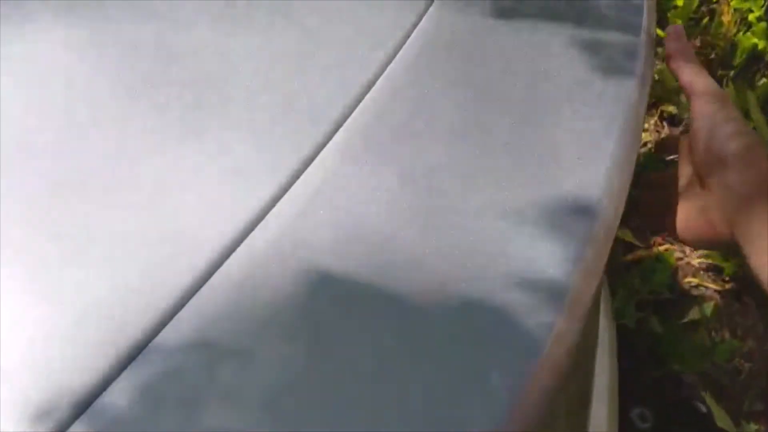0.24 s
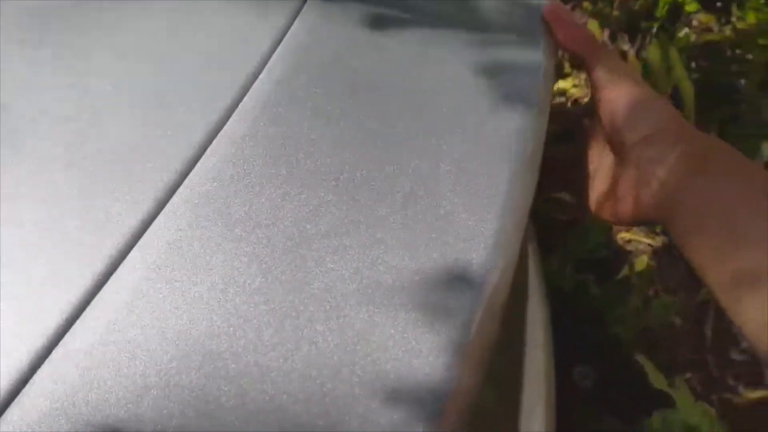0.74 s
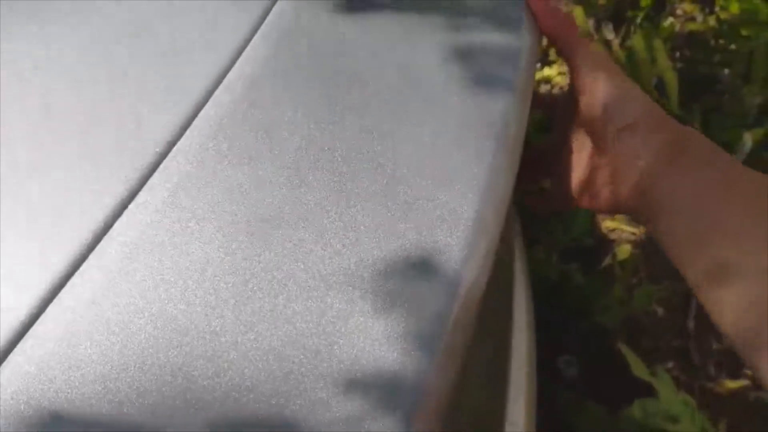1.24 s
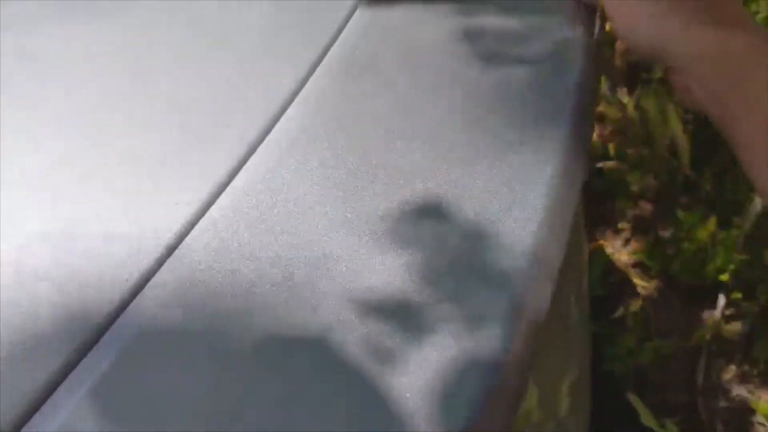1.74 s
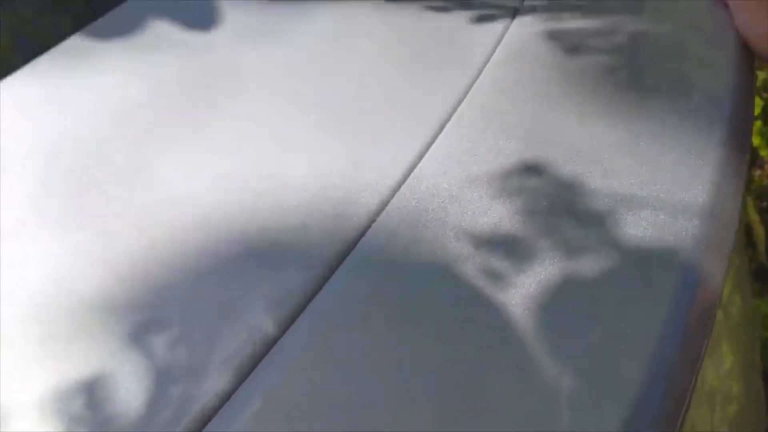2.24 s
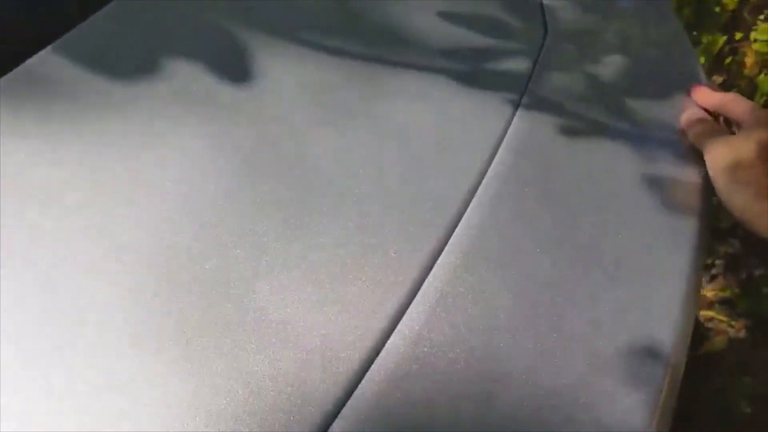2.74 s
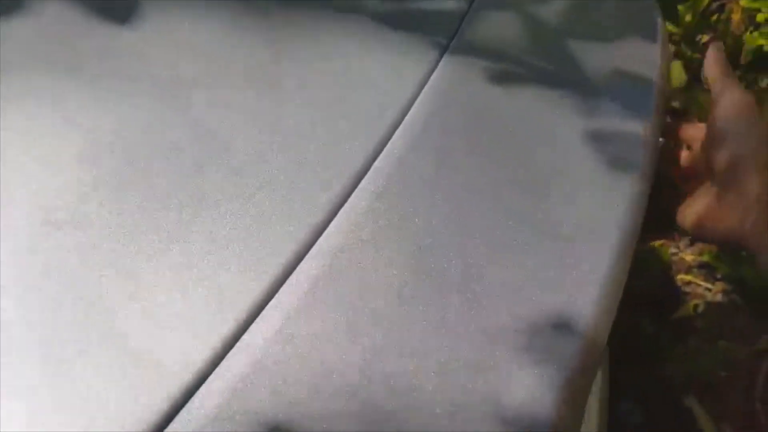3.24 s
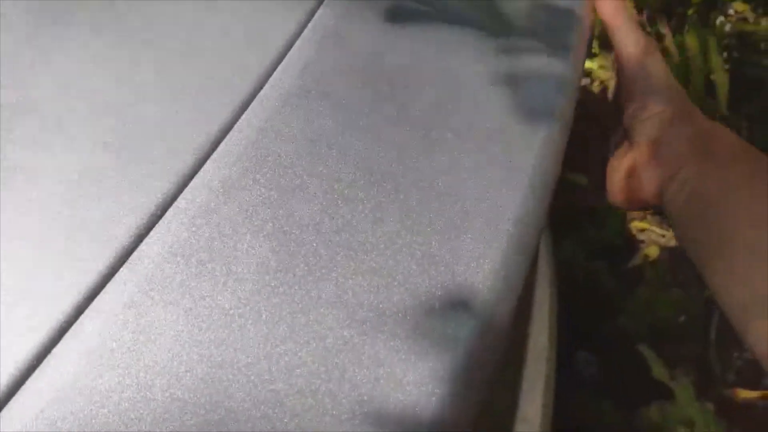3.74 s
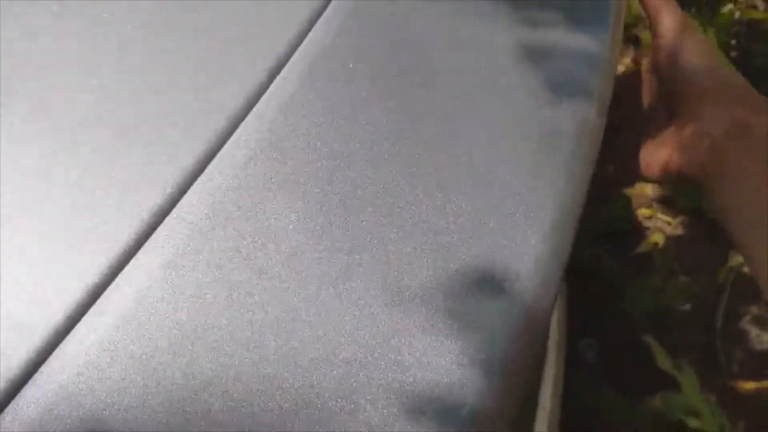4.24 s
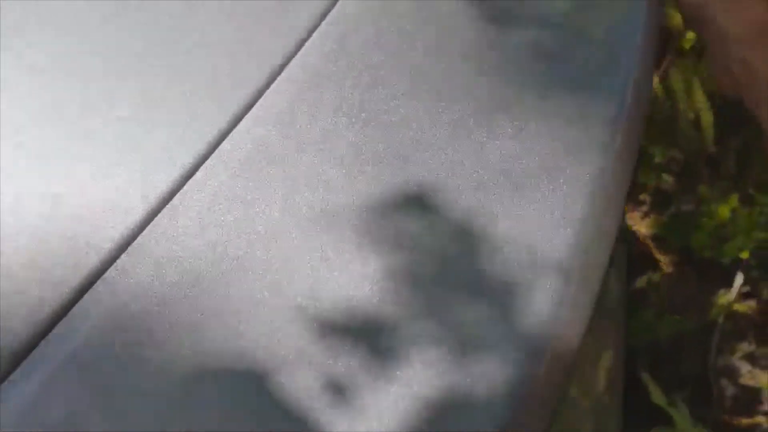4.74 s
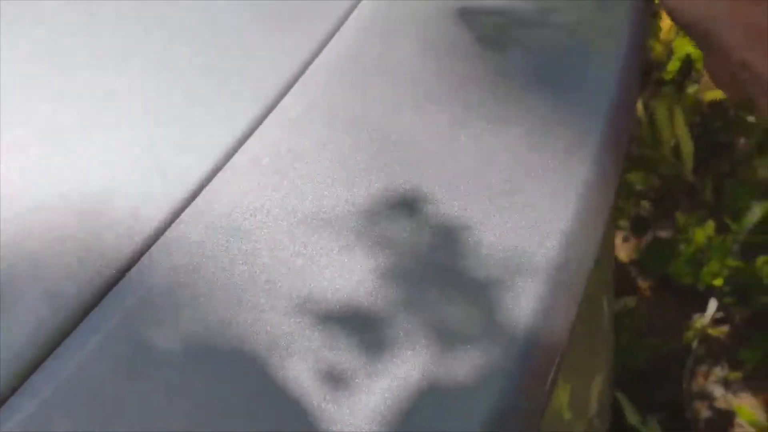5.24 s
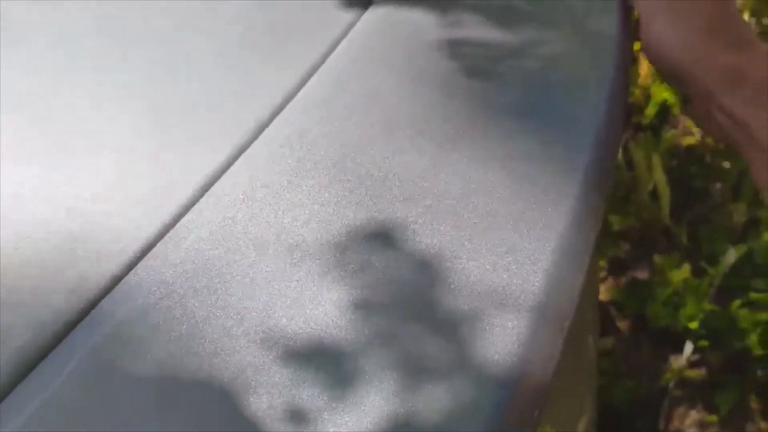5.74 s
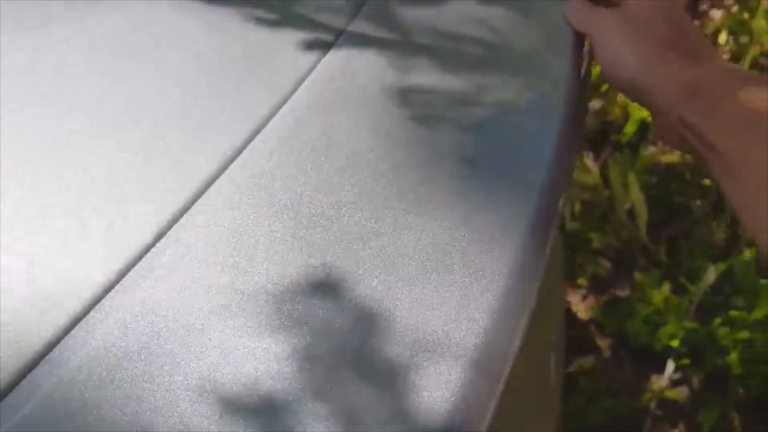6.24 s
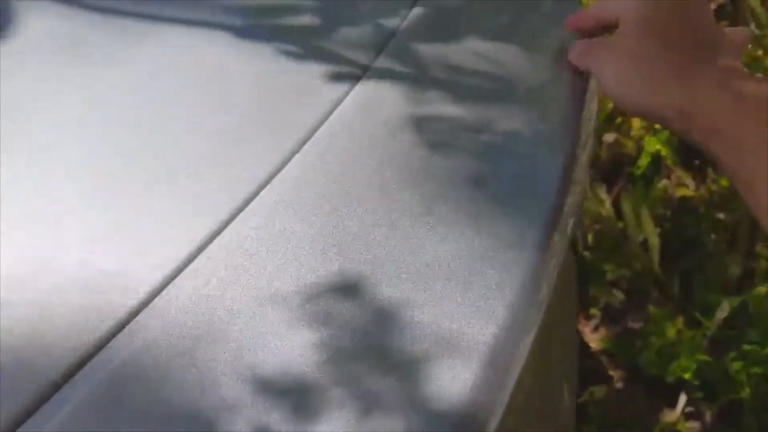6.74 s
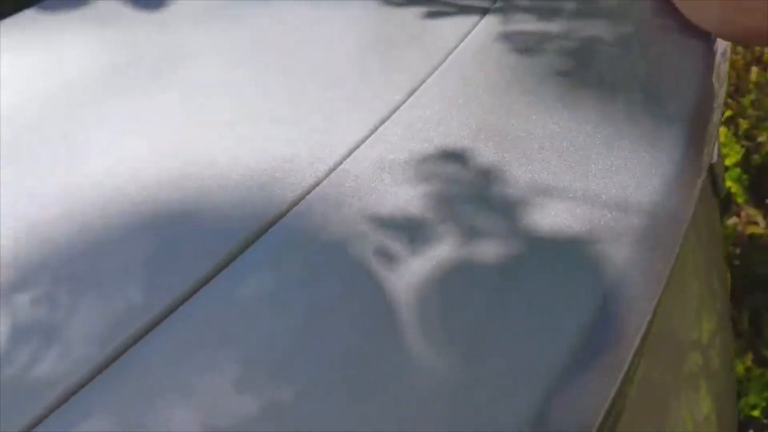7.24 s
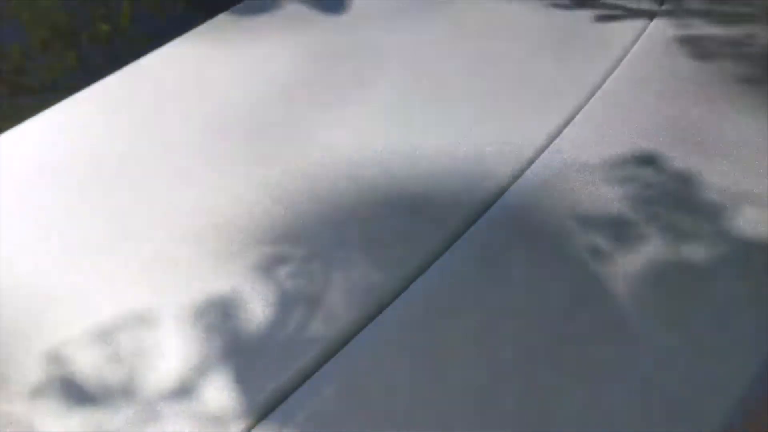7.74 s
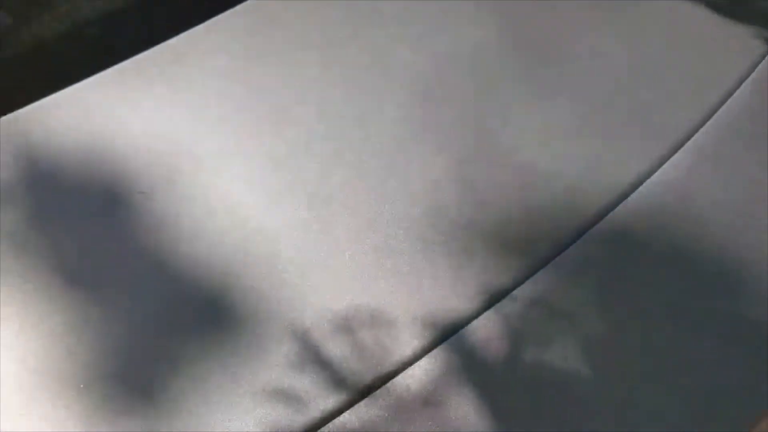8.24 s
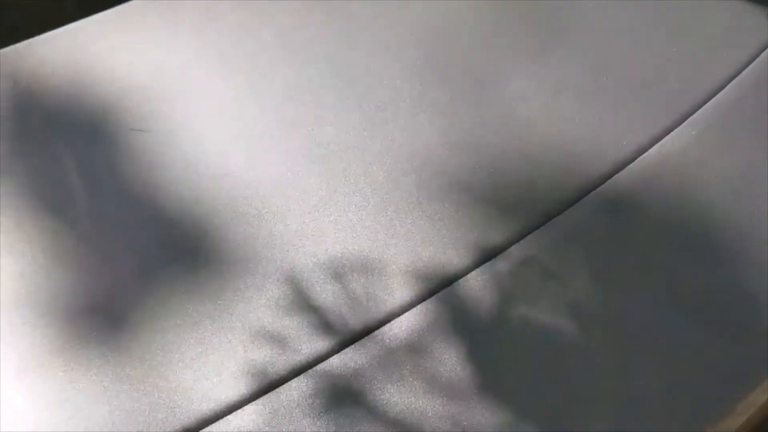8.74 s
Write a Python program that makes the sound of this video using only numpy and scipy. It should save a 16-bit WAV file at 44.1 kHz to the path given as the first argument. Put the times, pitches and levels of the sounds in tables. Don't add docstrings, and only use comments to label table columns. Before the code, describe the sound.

Close stereo pickup from over a car roof in open air. The handle is pulled with a scrape and double clack, and the door slams hard with rattling sheet metal. A second, slightly quicker pull follows, then grainy fingertip strokes on paint and increasingly frequent dry seal ticks before a gentler, duller closing. Faint birds, leaf hiss, far traffic drone and wind rumble fill the quiet gaps.

```python
import sys
import numpy as np
from scipy import signal
from scipy.io import wavfile

SR = 44100
rng = np.random.default_rng(int(sys.argv[2]) if len(sys.argv) > 2 else 0)


def invert_db(level):
    return 10 ** (np.asarray(level, dtype=float) / 20)


def file_out(sig):
    cols = np.atleast_2d(sig).T
    lim = np.clip(cols, -1, 1)
    pcm = np.round(lim * 32767).astype(np.int16)
    wavfile.write(sys.argv[1], SR, pcm)


N = 397341

LEFT_RIGHT = np.array([[1], [-1]])
# release_s, strength_db, pace [share of the usual time]
PULLS = [
    (1.238, -0.5, 1.001),
    (4.168, -1, .97),
]
# freq_hz, likeness [-1 to 1]
DOOR_LIKENESS = [(60, 0.25), (180, 1), (550, 0.81), (1650, -0.02), (4970, -0.023), (15000, -0.039)]
# freq_hz, left_right_db
DOOR_BALANCE = [(60, 0), (180, 2), (550, -2), (1650, -2), (4970, 0.5), (15000, -3)]
# freq_hz, likeness [-1 to 1]
AIR_LIKENESS = [(60, 0.78), (150, 0.86), (380, 0.7), (950, -0.39), (2380, 0.14), (5980, -0.078),
                (15000, 0.038)]


def rms_one(x):
    return x / np.sqrt(np.mean(x ** 2) + 1e-20)


def at_hz(points, hz):
    table_hz, value = np.array(points).T
    return np.interp(np.log(hz), np.log(table_hz), value)


def drift(rate):
    r = np.exp(-80 * np.pi * rate / SR)
    white = rng.standard_normal(N // 40 + 2002)
    slow = signal.lfilter([1], [1, -2 * r, r * r], white)[2000:]
    return np.interp(np.arange(N) / 40, np.arange(len(slow)), rms_one(slow))


def ring(x, hz, t60):
    r = invert_db(-60 / (t60 * SR))
    w = 2 * np.pi * hz / SR
    return signal.lfilter([0, np.sin(w)], [1, -2 * r * np.cos(w), r * r], x + 1e-18)


def spread(pair, likeness, hz):
    alike = np.clip(at_hz(likeness, hz), -1, 1)
    return np.sqrt(1 + alike) * pair[0] + np.sqrt(1 - alike) * pair[1] * LEFT_RIGHT


def bands(low_hz, high_hz, likeness):
    edges = np.geomspace(low_hz, high_hz, round(2 * np.log2(high_hz / low_hz)) + 1)
    white = rng.standard_normal((2, 2, N))
    for k, (low, high) in enumerate(zip(edges, edges[1:])):
        hz = np.sqrt(low * high)
        band = signal.butter(2, [low, high], "band", fs=SR, output="sos")
        yield hz, spread(signal.sosfilt(band, white[k % 2]), likeness, hz)


def add(out, s, sound):
    i = round(s * SR)
    out[:, i:i + sound.shape[-1]] += sound[..., :N - i]


def each_pull(rows):
    return [(at + pace * s, peak_db + strength_db, *rest)
            for at, strength_db, pace in PULLS for s, peak_db, *rest in rows]


def softer(rows, by_db):
    return [(s, peak_db + by_db, *rest) for s, peak_db, *rest in rows]


def contact(row, t):
    u = t / np.clip(row[4], .0003, .012)
    return u * np.exp(-u)


def blow_db(row, hz):
    return row[1] + at_hz([(250, row[2]), (1100, 0), (5500, row[3])], hz)


def door_contacts():
    # start_s, peak_db, bass_db and treble_db [re peak]
    slam_hard = [
        (2.583, -28, -6, 3.5),
        (2.604, -15.5, -2, -7),
        (2.607, -17, -9, -10),
        (2.611, -9.5, -9, -3.5),
        (2.62, -20, -1, -33),
        (2.633, -20.5, 4, -4.5),
        (2.65, -37, 8, 5),
        (2.674, -37.5, 9, 0),
        (2.693, -38, -5, -8),
    ]
    # start_s, peak_db, bass_db and treble_db [re peak]
    slam_soft = [
        (8.245, -28.5, -8, 3),
        (8.271, -14.5, -13.5, -20),
        (8.277, -13, -8.5, -1),
        (8.284, -13.5, -5, -5.5),
        (8.29, -22, 0, -29),
        (8.299, -20, -0.5, -34),
        (8.322, -37, -9, 10),
        (8.34, -30.5, -5, -13),
    ]
    # from_release_s, peak_db, bass_db and treble_db [re peak]
    latch_knocks = [
        (-.022, -25, -22, -15),
        (-.012, -29.5, 1.5, -3),
        (-.003, -35, -4, -17),
        (0.0, -18, -8.5, -15),
        (.006, -23.5, -12, -11),
        (.012, -28.5, -1, -16),
        (.028, -32, -1, -2),
    ]
    # from_release_s, peak_db, bass_db and treble_db [re peak]
    latch_scrapes = [
        (-.068, -32.5, -31, -23),
        (-.053, -34.5, -33, -5),
        (-.038, -32.5, -14, -5),
        (.036, -24.5, -8, -6.5),
        (.056, -24.5, -6, 2),
    ]
    # from_release_s, peak_db, bass_db and treble_db [re peak]
    handle_stop = [
        (.061, -40, -12, -16),
        (.0665, -17.5, -25, -7),
        (.072, -25, 10, -20),
        (.079, -31.5, 4, -23),
        (.088, -38, 1, -16),
    ]
    # start_s, peak_db, bass_db and treble_db [re peak]
    taps = [
        (1.572, -38, -1, -10),
        (1.579, -42, 2, -5),
        (1.604, -36, -9, -22),
        (3.013, -49, -1, -28),
        (4.502, -42.5, 1.5, 0),
        (4.507, -42.5, -1, 2),
        (4.588, -39, -16, -12),
        (5.664, -44, 1, -26),
        (7.872, -37.5, 2, -2.5),
    ]
    # start_s, peak_db, bass_db and treble_db [re peak]
    shifts = [
        (3.043, -56, 8, -14),
        (7.894, -43.5, 9, 5),
        (7.924, -46, 16, 3),
        (7.951, -51, 2, 5),
    ]
    knock_s, scrape_s, slam_s = 0.00067, 0.0046, 0.0011

    def lasting(rows, contact_s):
        return [(*row, contact_s) for row in rows]
    ajar = lasting(each_pull(latch_knocks) + taps, knock_s)
    ajar += lasting(each_pull(latch_scrapes) + shifts, scrape_s)
    stop = lasting(each_pull(handle_stop), knock_s)
    return ajar, stop, lasting(slam_hard, slam_s), lasting(slam_soft, slam_s)


def struck_metal(contacts, modes, level_db, cycles, scatter_db):
    out = np.zeros((2, N))
    t = np.arange(SR // 4) / SR
    hz, mode_db, t60 = np.transpose(modes)
    t60 = np.minimum(t60, cycles / hz)
    rings = np.exp(np.outer(2j * np.pi * hz - np.log(1000) / t60, t))
    lean = invert_db(mode_db + level_db + at_hz(DOOR_BALANCE, hz) / 2 * LEFT_RIGHT)
    for row in contacts:
        phase = 2 * np.pi * rng.random((2, len(hz)))
        luck = invert_db(scatter_db * rng.standard_normal((2, len(hz)))) * np.exp(1j * phase)
        strength = invert_db(blow_db(row, hz)) * lean * spread(luck, DOOR_LIKENESS, hz)
        build_up = np.cumsum(contact(row, t))
        add(out, row[0], (strength @ rings).imag * build_up / build_up[-1])
    return out


def door_rings(ajar, stop, hard, soft):
    # pitch_hz, level_db, t60_s
    skin_ajar = [(273.4, -0.5, 0.17), (373.0, -9.5, 0.2), (420, -3, 0.07), (580, -8.0, 0.17),
                 (663, -11, 0.2), (744, -28, 0.34), (982, -14.0, 0.12), (1123, -11, 0.21),
                 (1240, -51, 0.22), (1610, -12, 0.18), (1604, -54, 0.39), (1950, -16, 0.15),
                 (2040, -5, 0.2), (2285, -2.0, 0.1), (2415, -27.0, 0.069), (2600, -6.5, 0.3),
                 (139.0, -6.5, 0.33), (193, -1, 0.17), (522, -26.0, 0.073)]
    # pitch_hz, level_db, t60_s
    skin_hard = [(142.4, 0.5, 0.28), (282, -22, 0.35), (323.3, -0.5, 0.12), (388, -30, 0.15),
                 (425.0, 0, 0.13), (481, -15.0, 0.27), (557, -3.0, 0.08), (670, -2.0, 0.23),
                 (744, -8.0, 0.31), (820, -23, 0.08), (1010, -30.0, 0.072), (1113, -20.0, 0.2),
                 (1154, -9, 0.97), (1230, -30, 0.14), (1423, -2, 0.042), (1660, -37, 0.51),
                 (2086, -8, 0.13), (197, 0.0, 0.11), (894, -8.5, 0.18), (1400, 1.0, 0.034)]
    # pitch_hz, level_db, t60_s
    skin_soft = [(152, 4.0, 0.11), (260.3, -5.0, 0.29), (387, -24.0, 0.098), (466, -20, 0.45),
                 (586, -3, 0.11), (720, -20.5, 0.15), (770, -16, 0.33), (1190, -21, 0.18),
                 (1150, -14, 0.23), (1280, -30, 0.2), (1340, -12, 0.094), (1490, -37, 0.33),
                 (186.7, -11, 0.32), (315, -7.0, 0.23), (495.4, -1.0, 0.15)]
    # pitch_hz, level_db, t60_s
    frame = [(2293, -9.5, 0.11), (2424, -7, 0.1), (2726, -13.5, 0.19), (3014, -6.5, 0.087),
             (3386, -10, .15), (3820, -15.5, 0.24), (4074, -27, .15), (4290, -12, .13), (4530, -13, .12),
             (4807, -14, .15)]
    # pitch_hz, level_db, t60_s
    handle = [(264.3, -7, 0.21), (591.4, -20, 0.12), (739, -10, .11), (947, -0.5, .1), (1194, -12, 0.087),
              (1310, -22, 0.12), (1572, -12, 0.093), (1683, -9, 0.12), (1990, -5.5, 0.11), (2310, -19, .12),
              (2504, 3, .12), (2630, -1.5, 0.06), (2864, -5, .12), (3980, -18.5, .08)]
    # start_s, peak_db, bass_db and treble_db [re peak], contact_s
    linkage = [
        (4.101, -36, -15, -12, 0.00099),
        (4.586, -39.5, -15, -7, 0.00046),
        (1.202, -39, -15, -16, .0015),
        (1.238, -22, -20, -10, .0005),
        (1.305, -18, -23, -11, 0.00054),
        (1.318, -22, -20, -15, .001),
        (4.169, -30, -20, -12, .0005),
    ]
    out = struck_metal(hard, skin_hard, level_db=-9.0, cycles=120, scatter_db=1.5)
    out += struck_metal(soft, skin_soft, level_db=-8.5, cycles=180, scatter_db=4.5)
    out += struck_metal(hard + softer(soft, by_db=-3), frame, level_db=-17.0, cycles=380, scatter_db=4.0)
    out += struck_metal(ajar, skin_ajar, level_db=-9.5, cycles=107, scatter_db=4.0)
    out += struck_metal(stop, handle, level_db=-13.0, cycles=125, scatter_db=4.5)
    return out + struck_metal(linkage, handle, level_db=-10, cycles=120, scatter_db=1.5)


def panel_buzz(contacts, level_db, crack_db, crack_t60):
    # freq_hz, level_db
    colour = [(150, -1.5), (300, 10), (600, 7), (1200, 7), (2400, 4.5), (4800, 6), (9000, -7.5),
              (14000, -4)]
    # freq_hz, t60_s
    decay = [(200, 0.36), (600, 0.15), (1500, 0.14), (4000, 0.11), (10000, 0.09)]
    yard_t60_s, yard_db = 0.65, -27.5
    t = np.arange(SR // 16) / SR
    feeds = [(row, contact(row, t) ** 2) for row in contacts]
    out = 0
    for hz, noise in bands(143.8, 15460, DOOR_LIKENESS):
        power = np.full((1, N), 1e-18)
        for row, feed in feeds:
            add(power, row[0], invert_db(2 * blow_db(row, hz)) * feed / feed.sum())

        def dying(t60):
            return signal.lfilter([1], [1, -invert_db(-120 / (t60 * SR))], power)
        energy = dying(at_hz(decay, hz))
        energy = energy + invert_db(2 * crack_db) * dying(crack_t60) + invert_db(2 * yard_db) * dying(yard_t60_s)
        lean = invert_db(at_hz(DOOR_BALANCE, hz) / 2 * LEFT_RIGHT)
        out = out + invert_db(at_hz(colour, hz) + level_db) * lean * np.sqrt(energy) * rms_one(noise)
    return out


def thumps(lag_s):
    # start_s, peak_db, pitch_hz, t60_s, sign [push 1, pull -1]
    body_swings = [(0.253, -43.5, 74, 0.31, 1), (0.326, -39, 280.5, 0.23, 1), (2.606, -16, 36.2, 0.1, 1),
                   (2.611, -6, 75.6, 0.072, 1), (2.62, -5, 30, 0.088, -1), (2.635, -18, 113, 0.16, 1),
                   (2.645, -22, 151, 0.15, -1), (2.663, -14.5, 35.8, 0.15, -1), (2.69, -30, 150, 0.27, 1),
                   (2.688, -32, 570, 0.069, 1), (8.33, -30, 151, .25, 1), (2.712, -26.5, 31.2, 0.43, -1),
                   (2.755, -23.5, 50, 0.056, 1), (2.833, -35, 32.2, 0.25, -1), (4.921, -35, 57, 0.13, 1),
                   (4.971, -32.5, 61.6, 0.11, 1), (7.867, -33, 35.2, 0.13, 1), (7.912, -31, 40.6, 0.12, 1),
                   (8.275, -10.5, 31.5, 0.13, 1), (8.29, -10.5, 40, 0.078, -1), (8.301, -18, 102, 0.087, 1),
                   (8.292, -21, 574, 0.14, 1), (8.276, -24, 194, .07, -1), (8.329, -18, 32.5, 0.19, -1),
                   (8.386, -26, 29.3, 0.29, -1)]
    # from_release_s, peak_db, pitch_hz, t60_s, sign [push 1, pull -1]
    latch_swings = [
        (-.0145, -26, 44, 0.088, 1),
        (.002, -32.5, 90, 0.1, -1),
        (.008, -20, 580, 0.041, 1),
        (.02, -31, 178, 0.077, 1),
        (0.068, -47, 970, .09, 1),
        (.074, -25.5, 262, 0.19, 1),
        (.088, -29, 312, 0.14, 1),
    ]
    out = np.zeros((2, N))
    t = np.maximum(np.arange(SR // 2) / SR - lag_s * np.array([[0], [1]]), 0)
    for s, peak_db, hz, t60, sign in body_swings + each_pull(latch_swings):
        swing = np.sin(2 * np.pi * hz * t) * invert_db(peak_db - 60 * t / t60)
        add(out, s, np.sign(sign) * swing * invert_db(0.37 * LEFT_RIGHT))
    return out


def rubs(grain_db, upper_hz, upper_width):
    # middle_s, peak_db, swell_s, fade_s, cupped_db [re level]
    strokes = [(.75, -63.5, 0.13, 0.15, -1), (1.504, -66.5, 0.057, 0.054, -1),
               (1.63, -64.5, 0.043, 0.086, -2), (1.98, -61, 0.081, 0.14, -4),
               (3.016, -57, 0.015, 0.048, -0.5), (4.75, -65, .05, 0.18, -3), (5.22, -61.5, 0.07, 0.078, -6),
               (5.385, -56.5, 0.031, 0.031, -4.5), (5.63, -61.5, 0.055, .045, 1),
               (5.768, -49.5, 0.021, 0.026, -2.5), (5.965, -63, 0.036, 0.046, 4),
               (6.125, -53, 0.018, 0.022, 0), (6.34, -58.5, 0.044, 0.034, -3), (6.47, -55, 0.015, 0.029, 3),
               (6.675, -59.5, .065, .05, -3), (7.05, -64.5, 0.068, 0.086, -5),
               (8.215, -63, 0.049, 0.059, -5)]
    # freq_hz, level_db [per Hz]
    colour = [(1500, -6), (3000, -6), (4400, 0.5), (6000, -7.5), (10000, -11.5), (14000, -9)]
    edge_db, squareness = 11, 2.14
    t = np.arange(N) / SR
    level = upper = 0
    for s, peak_db, swell_s, fade_s, upper_db in strokes:
        away = np.maximum((s - t) / swell_s, (t - s) / fade_s)
        stroke = invert_db(peak_db - edge_db * away ** squareness)
        level = level + stroke
        upper = upper + invert_db(upper_db) * stroke
    grains = invert_db(grain_db * drift(240))
    broad = sum(invert_db(at_hz(colour, hz)) * noise for hz, noise in bands(1700, 16000, AIR_LIKENESS))
    cupped = ring(rng.standard_normal((2, N)), upper_hz, 2.2 / upper_width)
    return grains * (invert_db(2.0) * level * rms_one(broad) + upper * rms_one(cupped))


def ticks(split_hz, body_hz, body_db):
    # start_s, peak_db, left_right_db
    snaps = [(1.697, -50, .5), (2.4642, -42, -1.5), (3.0122, -44, -14), (5.269, -51, -1), (5.67, -46, -2),
             (5.7468, -51, 0), (5.751, -46, -2), (5.793, -38, -2), (6.1099, -47, 0), (6.345, -45, 0),
             (6.36, -57, 0), (6.67, -50, 0), (7.523, -52, 0), (6.0074, -52, -.5), (6.133, -44, -5),
             (6.1506, -37, -2), (6.4542, -49, 0), (6.4706, -43, 3), (6.5, -37, -1), (6.7094, -51, 1.5),
             (7.0399, -48, -1), (7.139, -43, -3), (7.4639, -49, 0.0), (7.4918, -38.5, -6.5),
             (7.556, -41, -6), (7.5632, -47, 3), (7.618, -40.5, 0), (7.699, -41, -1), (7.748, -40, -5),
             (7.8421, -38, 0), (7.988, -39, -5), (8.067, -43.5, .5), (8.166, -45, -2), (8.1774, -46, -2),
             (8.192, -49, -1.0)]
    rise_s, snap_t60_s, body_t60_s = 0.00036, 0.0087, 0.027
    treble_base_db, dulling = -4.5, 0.15
    seal_peels_s, seal_treble_db = 7.4, 5
    out = np.zeros((2, N))
    t = np.arange(SR // 20) / SR
    body, middle, top = (signal.butter(2, edges, "band", fs=SR, output="sos")
                         for edges in ([3000, body_hz], [body_hz, split_hz], [0.83 * split_hz, 16200]))
    rise = 1 - np.exp(-t / rise_s)
    snap = rise * invert_db(-60 * t / snap_t60_s)
    hum = rise * invert_db(-60 * t / body_t60_s)
    for s, peak_db, pan_db in snaps:
        low, mid, high = rng.standard_normal((3, 2, len(t))) * invert_db(peak_db + pan_db / 2 * LEFT_RIGHT)
        treble_db = treble_base_db - dulling * (peak_db + 42) + seal_treble_db * (s > seal_peels_s)
        tick = invert_db(body_db) * signal.sosfilt(body, low * hum)
        tick += invert_db(9.0) * signal.sosfilt(middle, mid * snap)
        tick += invert_db(treble_db) * signal.sosfilt(top, high * snap)
        add(out, s, tick)
    return signal.sosfilt(signal.cheby2(8, 40, 16900, fs=SR, output="sos"), out)


def birds(wobble_hz, flutter_db, echo_db):
    # start_s, length_s, start_hz, top_hz, level_db
    peeps = [(0.367, 0.088, 3610, 3700, -58), (2.087, .04, 3300, 3140, -59.5),
             (2.256, 0.043, 4750, 4720, -63), (3.69, .04, 3680, 3630, -62), (3.833, 0.05, 3260, 3300, -58),
             (4.053, 0.045, 2840, 3350, -56), (4.296, .035, 3020, 3050, -56),
             (4.515, 0.06, 2840, 3110, -56), (4.748, .036, 2750, 3290, -57),
             (4.999, 0.056, 2800, 3070, -55.5), (5.474, 0.034, 3050, 3200, -62),
             (5.508, 0.024, 3030, 3170, -56), (5.547, 0.032, 1840, 1820, -53),
             (5.519, .025, 1750, 2050, -59), (3.908, .035, 1950, 1950, -57), (4.612, .014, 2280, 1750, -56),
             (4.849, 0.023, 2170, 1770, -56), (5.1, .024, 2080, 1810, -57), (5.24, 0.045, 2690, 2960, -57),
             (5.304, 0.029, 2560, 2600, -57)]
    out = np.zeros((2, N))
    wobble = wobble_hz * drift(90)
    flutter = invert_db(flutter_db * np.tanh([drift(90), drift(90)]))
    for s, length, start_hz, top_hz, level_db in peeps:
        u = np.linspace(0, 1, round(length * SR))
        hz = start_hz + (top_hz - start_hz) * np.sin(2.1 * u) + wobble[round(s * SR):][:len(u)]
        phase = 2 * np.pi * np.cumsum(hz) / SR
        peep = invert_db(level_db) * np.sin(np.pi * u) * np.sin(phase + 0.7 * LEFT_RIGHT)
        add(out, s, peep)
        add(out, s + .027, invert_db(echo_db) * peep[::-1])
    return out * flutter


def patchy(spectrum, low_hz, high_hz, patchy_db):
    together = drift(0.88)
    return rms_one(sum(invert_db(at_hz(spectrum, hz) + patchy_db * (0.5 * together + drift(7.2))) * noise
                       for hz, noise in bands(low_hz, high_hz, AIR_LIKENESS)))


def surroundings():
    # start_s, level_db
    gusts = [(0.0, -55), (0.98, -61), (1.36, -57), (1.88, -65), (2.26, -59), (2.66, -52), (2.78, -47),
             (2.96, -57), (3.84, -63), (4.26, -51), (4.49, -59.5), (7.5, -60), (7.78, -56), (8.35, -46.5),
             (8.66, -59), (9.01, -59)]
    # freq_hz, level_db [per Hz]
    breeze_colour = [(12, -34), (20, 3), (49, -4.5), (124, -16), (146, -15), (200, 2), (260, -28),
                     (440, -120)]
    # freq_hz, level_db [per Hz]
    drone_colour = [(59, -46), (100, -28), (151, -15.5), (225, 3.5), (263, -9.5), (350, -2), (386, -7),
                    (584, -15.5), (713, -8), (3000, -23.5), (3900, -59), (6600, -120)]
    # pitch_hz, width_hz, level_db
    drone_peaks = [(222, 22.6, -2), (343.3, 65, -5.5), (446.4, 17.4, -9.5), (587, 204, -4.5)]
    # freq_hz, level_db [per Hz]
    leaf_colour = [(1000, -2), (2100, -12.5), (3700, -7.5), (5500, -11), (7500, -14.5), (10500, -19),
                   (14000, -18)]
    t = np.arange(N) / SR
    gust_s, gust_level_db = np.transpose(gusts)
    breeze_db = np.interp(t, gust_s, gust_level_db)
    gust_db = breeze_db - breeze_db.mean()
    drone_db = -51 + 0.018 * gust_db
    leaves_db = -58 + 0.18 * gust_db - 0.34 * t
    hollow = 0
    for hz, width, level_db in drone_peaks:
        tone = rms_one(ring(rng.standard_normal((2, N)), hz, 2.66 / width))
        hollow = hollow + invert_db(level_db) * spread(tone, AIR_LIKENESS, hz)
    drone = invert_db(-3.0) * patchy(drone_colour, 116.5, 3060, patchy_db=2.0)
    drone = drone + invert_db(-5.5 + 1.58 * drift(7.0)) * hollow
    breeze = invert_db(breeze_db + 1.0) * patchy(breeze_colour, 15.54, 133.5, patchy_db=4.0)
    leaves = invert_db(leaves_db) * patchy(leaf_colour, 1133, 17600, patchy_db=0.0)
    return breeze + invert_db(drone_db) * drone + leaves


def scene():
    ajar, stop, hard, soft = door_contacts()
    buzzing = softer(ajar, -2) + softer(stop, -3) + hard + softer(soft, -2)
    steady = door_rings(ajar, stop, hard, soft)
    steady += panel_buzz(buzzing, level_db=-21.0, crack_db=5.0, crack_t60=0.0096)
    steady += thumps(lag_s=0.00034)
    steady += rubs(grain_db=4.0, upper_hz=8000, upper_width=1000)
    snaps = ticks(split_hz=8500, body_hz=5200, body_db=1.5)
    steady += birds(wobble_hz=55, flutter_db=4.0, echo_db=-7)
    steady += surroundings()
    return signal.sosfilt(signal.cheby2(14, 65, 14800, fs=SR, output="sos"), steady) + snaps


def top_cut(x):
    return signal.sosfilt(signal.butter(12, 15680, fs=SR, output="sos"), x)


def record(dry):
    mix = 1.627 * np.tanh(dry / 1.58)
    return top_cut(mix)


dry = scene()
out = record(dry)
file_out(out)
```